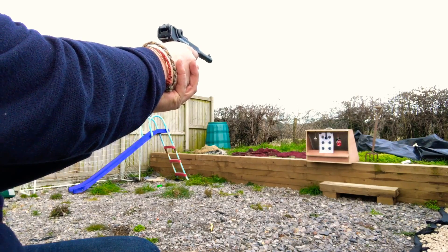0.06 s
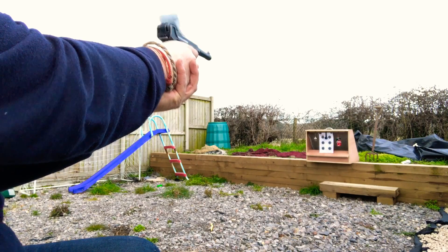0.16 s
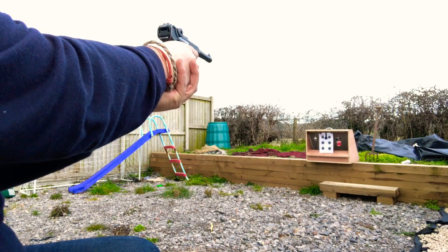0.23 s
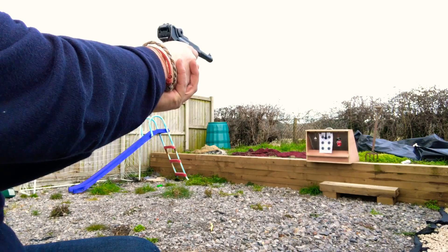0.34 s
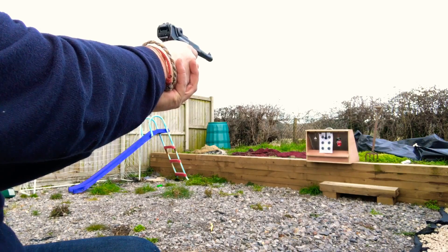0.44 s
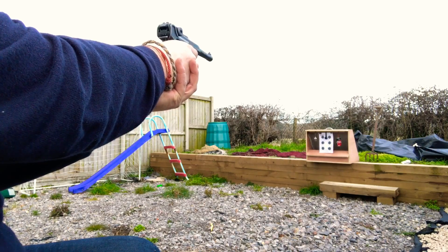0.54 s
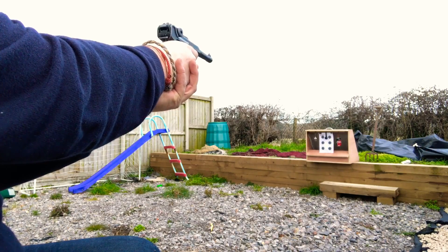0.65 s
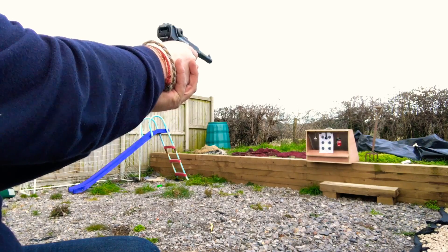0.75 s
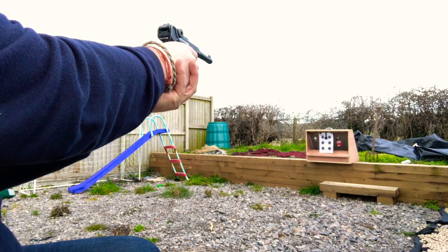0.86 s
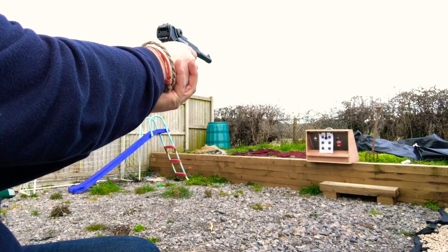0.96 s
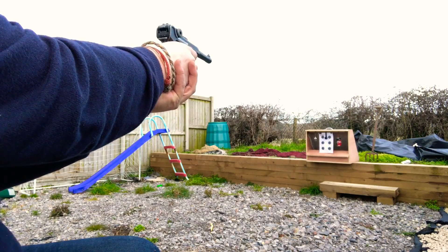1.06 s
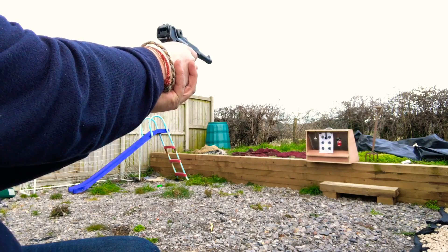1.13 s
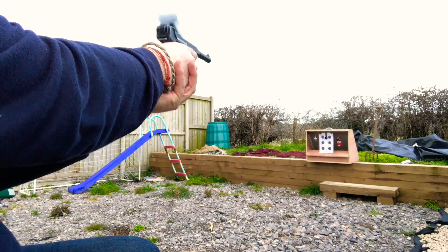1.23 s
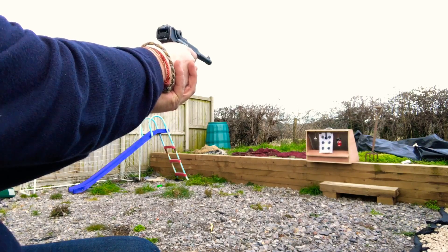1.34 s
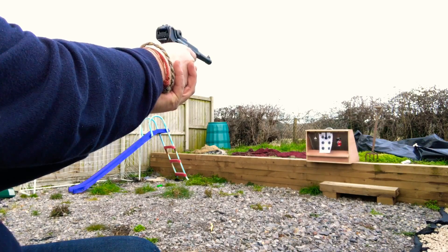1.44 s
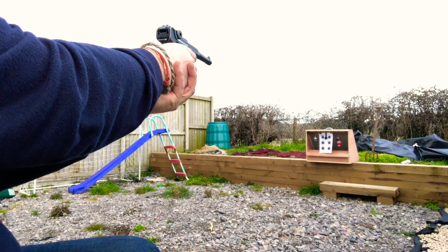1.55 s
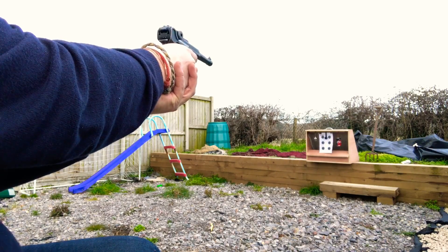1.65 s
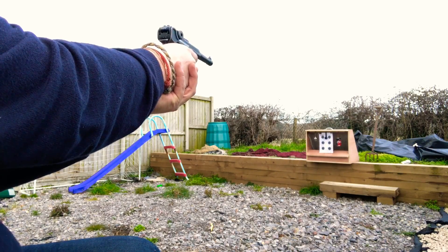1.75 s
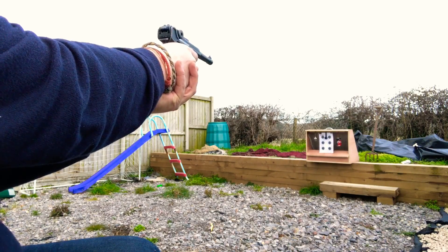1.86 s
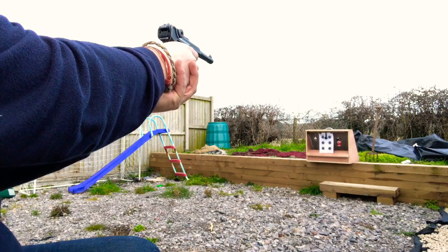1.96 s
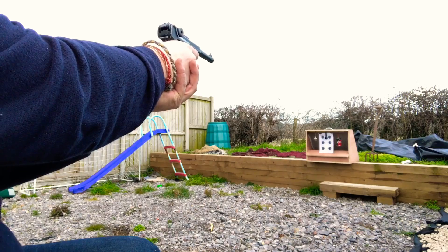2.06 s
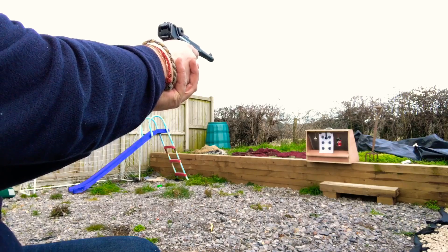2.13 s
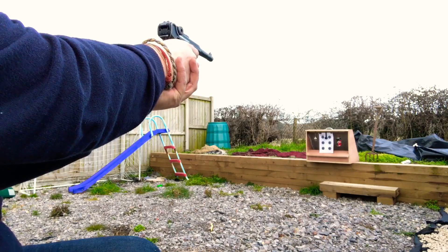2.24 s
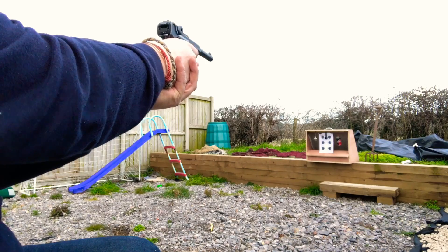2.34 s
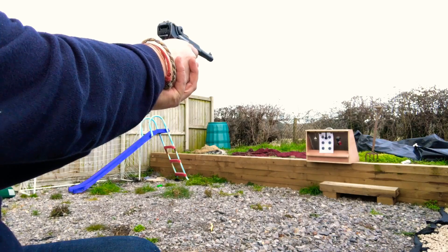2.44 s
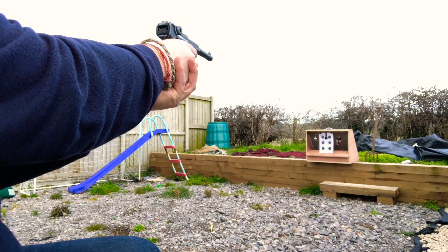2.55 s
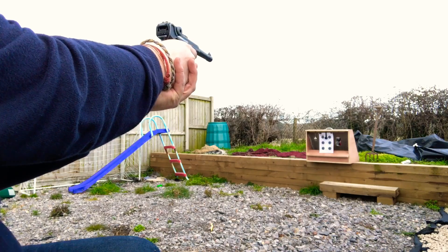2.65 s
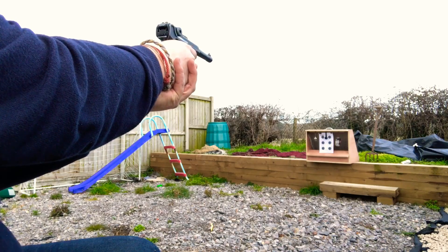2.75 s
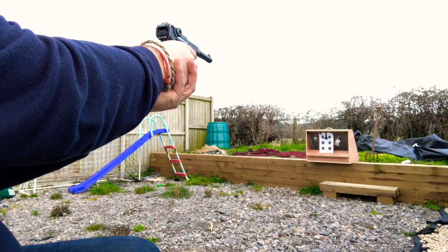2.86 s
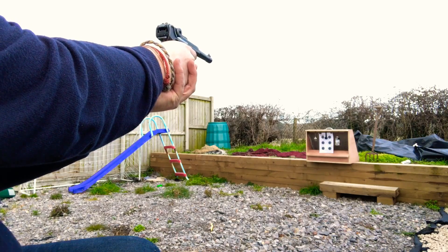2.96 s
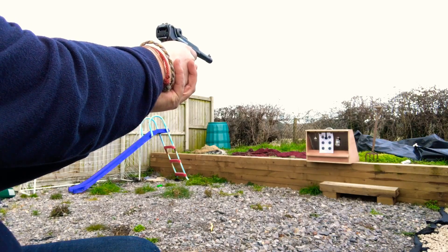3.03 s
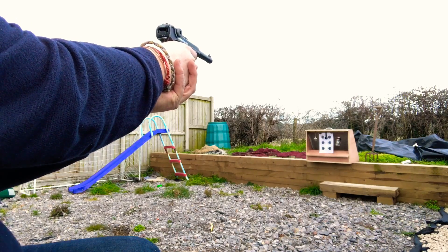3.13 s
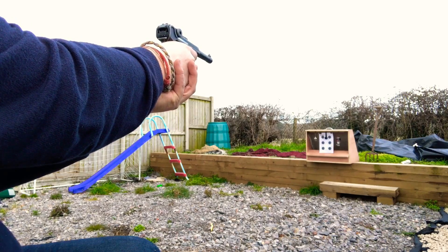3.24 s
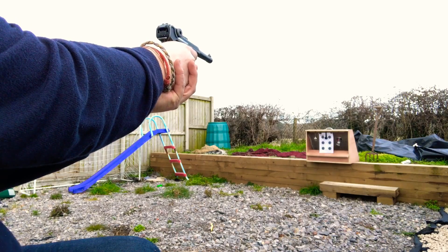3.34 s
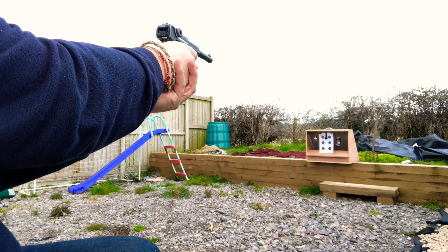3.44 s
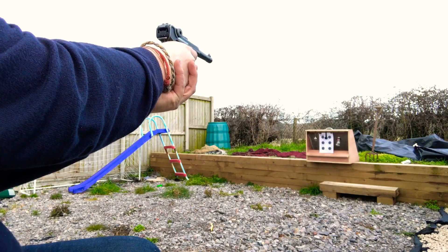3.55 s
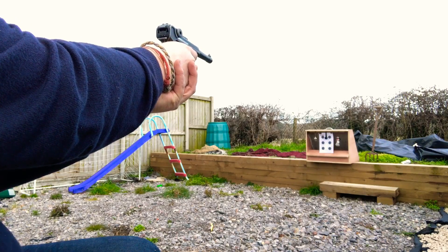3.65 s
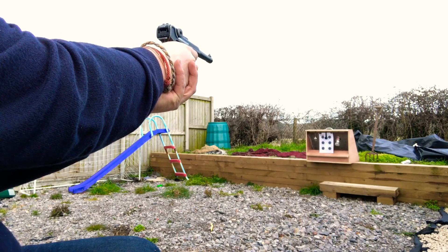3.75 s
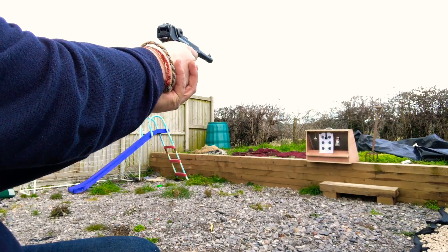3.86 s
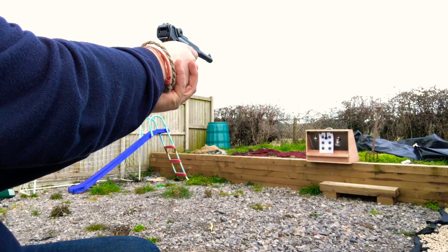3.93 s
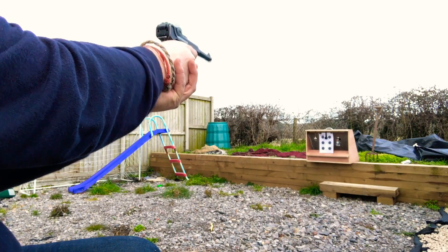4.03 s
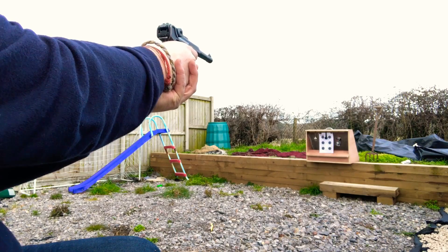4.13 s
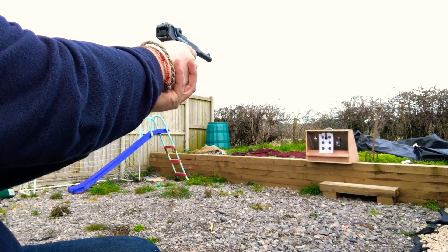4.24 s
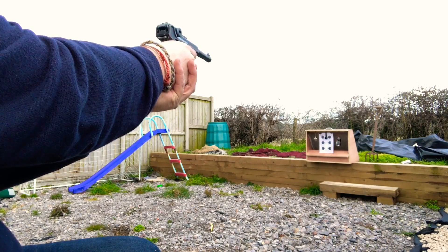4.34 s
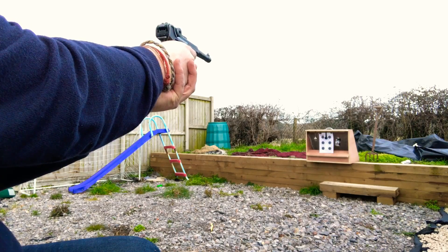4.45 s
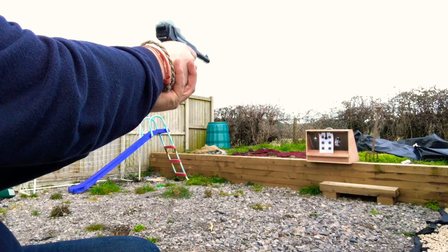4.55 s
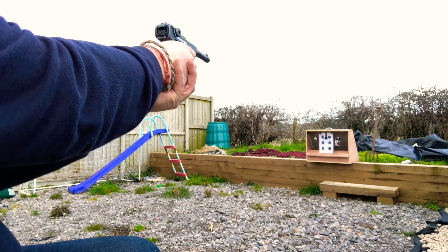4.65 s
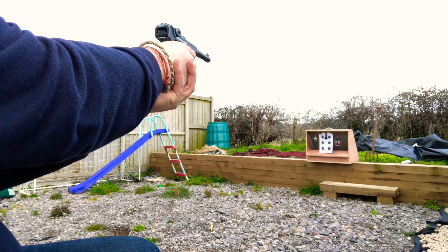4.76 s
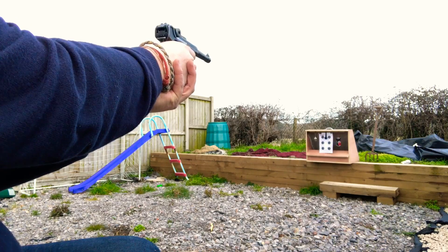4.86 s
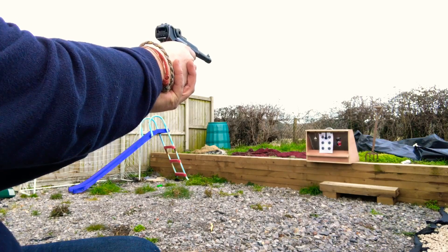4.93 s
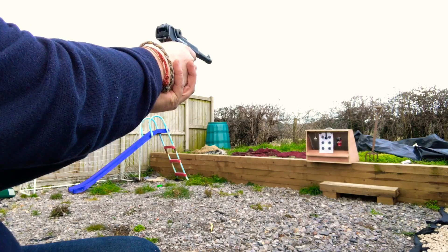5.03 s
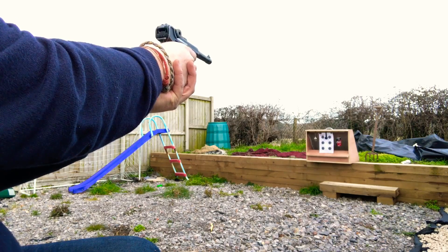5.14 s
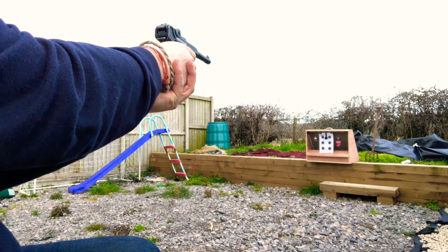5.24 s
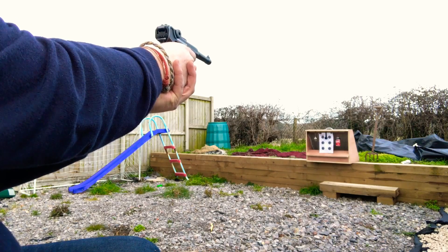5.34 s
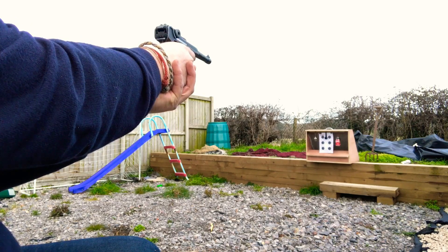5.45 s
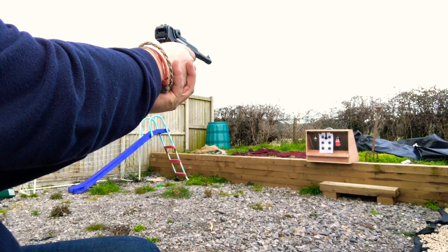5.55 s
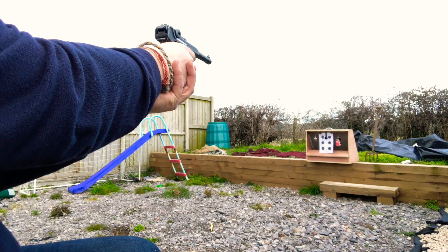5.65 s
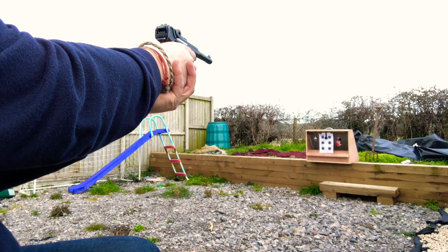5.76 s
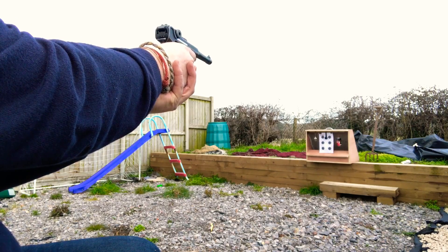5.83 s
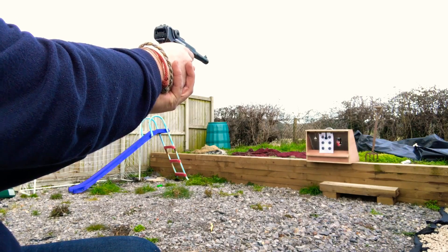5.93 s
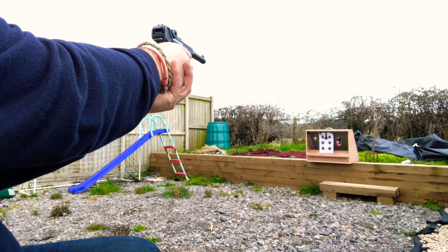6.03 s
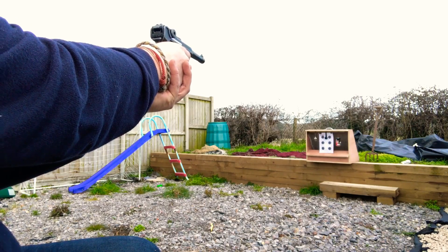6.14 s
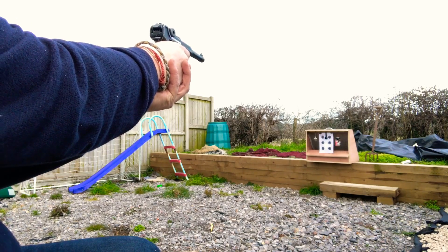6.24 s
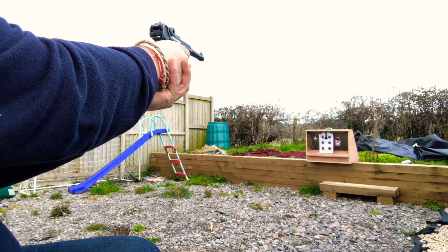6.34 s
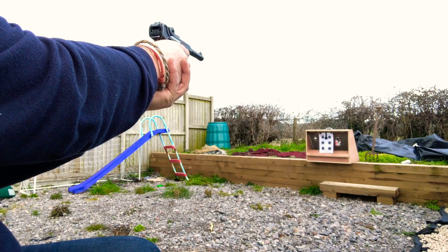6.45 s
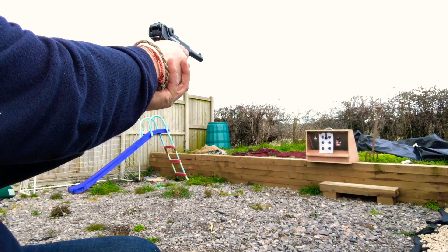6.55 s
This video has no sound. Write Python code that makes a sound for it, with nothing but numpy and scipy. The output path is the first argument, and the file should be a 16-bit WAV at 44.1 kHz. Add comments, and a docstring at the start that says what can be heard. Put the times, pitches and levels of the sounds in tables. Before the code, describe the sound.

Outdoors, three pistol shots come about half a second apart, then a fourth after a longer gap, whose ball hits a tin target that clatters and settles. A quiet pause with faint bird chirps follows, then three more shots. Each is a dry, bright mechanical crack with a puffing thump, closely followed, except the fifth, by a knock on a hollow wooden box. Echoes scatter off fences; a far road hushes beneath; the pistol is close and slightly saturated.

```python
"""Distant traffic washes steadily as filtered noise. Over it a blowback gas pistol fires seven shots in a gravel
garden: noise bursts clack, a pressure pulse thumps from the muzzle and the toggle snaps shut, a little later each shot.
Steel balls crack against a box and excite its panel modes; the hits return from the far end, and spent balls click.
Faint birds whistle as wavering sines, and one ball knocks down a tin target, a bank of decaying modes.
Echoes and a scattered tail follow all but the traffic."""
import sys
import numpy as np
from scipy import signal
from scipy.fft import rfft, irfft
from scipy.io import wavfile
from scipy.ndimage import uniform_filter1d

SR = 44100
rng = np.random.default_rng(int(sys.argv[2]) if len(sys.argv) > 2 else 0)


def persist_wave(psi):
    """Save psi, clipped to +-1, as 16-bit WAV."""
    counts = np.round(np.clip(psi, -1, 1) * 32767).astype(np.int16)
    wavfile.write(sys.argv[1], SR, np.atleast_2d(counts).T)


N = 290619  # samples
AGE = np.arange(SR) / SR  # seconds since a sound began

# Spectrum of the distant road. Each row: frequency in Hz, relative level in dB.
TRAFFIC_SPECTRUM = [(15, -44), (25, -18.5), (59, 2), (114, -3), (285, -5.5), (363, -12.5), (887, -5.5),
                    (1100, -8), (1900, -28), (2600, -31.5), (3820, -31), (16000, -45.5)]
TRAFFIC_DB = -56

# The shots. Each row: hammer fall in seconds, delay of the muzzle gas in seconds, muzzle gas level in dB,
# pitch of its thump in Hz, toggle snap level in dB.
SHOTS = [(.207, .0175, -8, 313, -8.5), (.7739, 0.019, -6.5, 275, -9), (1.2779, .018, -11, 300, -8.5),
         (2.3362, .0197, -7.5, 281, -0.5), (4.055, .019, -9, 283, -8), (4.6213, 0.02, -6.5, 283, -7),
         (5.2474, 0.021, -5, 321.3, -5)]
# Steel contacts in every shot. Each row: delay after the hammer in seconds, level in dB re HAMMER_DB,
# decay in seconds.
ACTION_CONTACTS = [(-.017, -39, 0.0088), (-.0052, -23.5, 0.0048), (0, 2, 0.0025), (.0053, 2, 0.0026),
                   (.0082, -2, .0016), (0.0212, -5, .004), (.030, -7.5, 0.0057)]
HAMMER_DB = -8.5  # the spring strikes equally hard every time
TOGGLE_LAG_S = .0683  # after the hammer, in the first shot
SLOWING_PER_SHOT = .0175  # the gas cools, so the toggle's lag grows by this share of the first
# The trigger ticks under the finger. Each row: start in seconds, level in dB.
TRIGGER_TICKS = [(2.2493, -46), (3.265, -58), (3.43, -59), (4.5758, -54), (5.089, -53.5)]
# Resonances of the pistol frame. Each row: frequency in Hz, width in Hz, relative level in dB.
FRAME_RESONANCES = [(1310, 180, -4.5), (1690, 180, -5.5), (1980, 240, -5), (3400, 220, -9.5),
                    (4400, 180, -11), (5150, 380, 0.5), (6680, 540, -2), (7500, 310, -9.5),
                    (11550, 290, -1.5), (13400, 370, -2), (15500, 490, -6.5)]
# Spectra of steel contacts, muzzle gas and gas from the open breech.
# Each row: frequency in Hz, relative level in dB.
STEEL_SPECTRUM = [(300, -21), (850, -4.5), (1400, 2.5), (3000, 0.5), (5000, 2.5), (7700, 4.5), (9700, -4),
                  (12500, 0.5), (16000, -6.5)]
MUZZLE_SPECTRUM = [(80, -17), (400, 8), (750, 2), (1300, -1), (2300, -6.5), (6000, -9), (16000, -21.5)]
BREECH_SPECTRUM = [(80, -14), (260, 2.5), (600, -2), (2300, -5.5), (6000, -3.5), (9500, -8.5), (16000, -10)]

# Echoes off ground, house and fences. Each row: delay in seconds, level in dB.
ECHOES = [(.0205, -14), (.0315, -18.5), (.046, -19)]
# The garden's tail. Each row: band centre in Hz, relative level in dB, time to fall 60 dB in seconds.
GARDEN_BANDS = [(60, -2, 0.33), (130, 0, 0.87), (252, 0, 0.47), (595, -7, 0.55), (1330, -1, 0.67),
                (2850, -3.5, 0.57), (5480, -7, 0.46), (9000, 0, 0.27), (15000, -6.5, 0.32)]
PATCH_DB, PATCHES_PER_S = 3.3, 240  # scattered sound returns in uneven patches

# Ball strikes on the box. Each row: start in seconds, level in dB, then panel boom in dB re that level,
# panel pitch favoured by the spot in Hz, and hard edge, rebound and returning ping in dB re that level.
HITS = [(.292, -8, 1, 205, -14.5, -11.5, -29.5), (0.8565, -8.5, -2.5, 119.5, -18, -32.5, -33.5),
        (1.3653, -7.5, -1.5, 205, -12, -14, -36), (2.4221, -10, 1.5, 1154, -13, -33.5, -29),
        (4.71, -8, -4, 199, -12, -13, -34.5), (5.338, -12.5, 0.5, 423.5, 2.5, -44, -40)]
# Resonances of the box. Each row: frequency in Hz, width in Hz, relative level in dB.
BOX_RESONANCES = [(1577, 450, -11), (2950, 100, -1.5), (3440, 170, 5), (4250, 270, -3.5), (5400, 500, -15),
                  (7680, 590, -6.5)]
# Modes of the box panels. Each row: frequency in Hz, relative level in dB, time to fall 60 dB in seconds.
PANEL_MODES = [(118, -18, 0.28), (211.6, -23, 0.53), (349, -26.5, 0.5), (402, -19, 0.29),
               (690, -14.5, 0.12), (1011, -11.5, 0.092), (1144, -12.5, 0.17), (1383, -17, 0.12)]
# Spectrum of struck wood. Each row: frequency in Hz, relative level in dB.
WOOD_SPECTRUM = [(80, -18.5), (270, 3.5), (700, -6.5), (2400, -2.5), (3400, -1), (7500, -3), (9800, -17),
                 (16000, -24)]
# the ball rebounds inside the box and strikes a second wall
REBOUND_S, REBOUND_BOOM_DB, REBOUND_HZ, REBOUND_EDGE_DB = .041, -7.5, 1200, -2
SLAP_S, SLAP_DB = 0.011, -8.5  # the fence throws each crack back; dB re the crack

# Blurred tones of the returning ping. Each row: frequency in Hz, width in Hz, relative level in dB.
PING_TONES = [(2420, 240, -2), (2930, 200, -.5), (3480, 300, -3), (5620, 260, 0)]
RETURN_S, RETURN_DB, PING_DECAY_S = .1245, -28, .04  # dB re the hit

# Spent balls drop on wood, graze the box and hop. Each row: start in seconds, level in dB, spot pitch in Hz.
LANDINGS = [(.437, -38.5, 3360), (0.573, -38, 3416), (.608, -46, 1865), (.684, -53.5, 3510),
            (0.989, -37.5, 7570), (1.653, -38, 3400), (1.697, -50.5, 1850), (1.762, -40.5, 3440),
            (1.901, -38.5, 3400), (4.811, -43, 7350), (4.93, -39.5, 3406), (5.041, -48, 3430)]
LANDING_EDGE_DB = -20  # re the click

# Far birds. Each row: start in seconds, length in seconds, first pitch in Hz, last pitch in Hz.
BIRD_NOTES = [(2.112, 0.14, 2660, 2570), (3.678, .1, 2594, 2600), (3.817, .07, 2575, 2550),
              (5.657, .3, 1984, 2134), (6.012, 0.29, 2950, 3280), (6.144, 0.05, 3550, 3630),
              (6.33, 0.13, 6300, 5590), (6.39, .035, 4050, 3950)]
BIRD_DB, BIRD_DB_PER_OCTAVE = -70.5, -4  # level at 2 kHz; the air dulls higher notes
BIRD_FLUTTER_DB, BIRD_WAVER = 3, .018  # waver as a share of the pitch

# The tin is struck, then tumbles from edge to edge. Each row: start in seconds, level in dB,
# pitch favoured by the spot in Hz.
TUMBLE = [(2.4256, -17, 4450), (2.528, -41.5, 8800), (2.548, -37.5, 3800), (2.574, -41, 6000),
          (2.6068, -34, 8100), (2.619, -33.5, 7800), (2.657, -34.5, 1620), (2.6647, -28, 3900),
          (2.7295, -39.5, 4460), (2.742, -35.5, 6400), (2.7525, -32.5, 7300), (2.791, -46.5, 7850),
          (2.8152, -46, 4970), (2.8455, -45, 4840), (2.8723, -42, 1730), (2.902, -42, 7620),
          (2.926, -46, 7740)]
# Low modes of the tin. Each row: frequency in Hz, relative level in dB, time to fall 60 dB in seconds.
TIN_LOW_MODES = [(702.6, -9, 0.25), (872, -12, .35), (1001, -5.5, 0.4), (1230, -5.5, .25),
                 (1378, -10.5, .2), (1770, -5.5, 0.12), (2570, -8.5, 0.24), (3210, -5, .11)]
# Clusters of the tin's crowded upper modes. Each row: frequency in Hz, relative level in dB.
TIN_CLUSTERS = [(1500, -10), (2300, -13), (3300, -1), (4700, 0), (6500, -5), (7700, 1), (9000, -9),
                (10100, -5), (11500, -13), (12800, -1), (14200, -11), (15800, -12)]
TIN_TOP_T60, TIN_REST_S = .1, 2.97  # seconds to fall 60 dB; time at which the tin lies flat

TOP_HZ = 16000  # upper limit of the microphone's band


def amp(db):
    """Decibels to linear gain: twenty to each factor of ten."""
    return 10 ** (np.asarray(db) / 20)


def add(track, s, sound):
    """Superposition: mix a sound into a track from a time in seconds."""
    start = int(s * SR)
    track[start:start + len(sound)] += sound[:N - start]


def unit(response):
    """Energy normalisation: scale a response to unit energy."""
    return response / np.sqrt(np.sum(response ** 2))


def through(x, response):
    """Convolution: pass a sound through an impulse response."""
    return signal.fftconvolve(x, response)[:len(x)]


def thin(x, hz):
    """High-pass filtering: take away the lows below a corner."""
    return signal.sosfilt(signal.butter(2, hz, "high", fs=SR, output="sos"), x)


def colour(points, size=4096):
    """Minimum phase: fold the cepstrum of a (Hz, dB) spectrum into a causal impulse response."""
    hz, db = np.transpose(points)
    log_hz = np.log(np.fft.rfftfreq(size, 1 / SR) + 1)
    log_gain = np.log(amp(np.interp(log_hz, np.log(hz), db)))
    cepstrum = irfft(log_gain)
    cepstrum[1:size // 2] *= 2
    cepstrum[size // 2 + 1:] = 0
    return irfft(np.exp(rfft(cepstrum)), size)


def resonances(rows, size=4096):
    """Damped resonance: a wider (Hz, width, dB) peak decays faster; returns their impulse response."""
    t = AGE[:size]
    response = 0
    for hz, width, db in rows:
        decay = np.exp(-np.pi * width * t)
        response = response + amp(db) * 2 * np.pi * width / SR * decay * np.cos(2 * np.pi * hz * t)
    return response


def burst(rise, decay, size=4096):
    """Transient noise: contact chatter or a puff of gas swells linearly and dies exponentially."""
    t = AGE[:size]
    shape = np.minimum(t / rise, 1) * np.exp(-np.maximum(t - rise, 0) / decay)
    return shape * rng.standard_normal(size)


def walk(rate):
    """Smoothed random steps: slow chance with a spread near 1."""
    k = int(SR / rate)
    held = np.repeat(rng.standard_normal(N // k + 1), k)
    return uniform_filter1d(held, k)[:N] * np.sqrt(3 / 2)


def thump(hz, width, size=2048):
    """Pressure pulse with a dip either side; returns it and the seconds before its centre."""
    t = (np.arange(size) - size // 2) / SR
    return np.exp(-np.abs(t / width) ** 1.6) * np.cos(2 * np.pi * hz * t), size / 2 / SR


def ringing(hz, t60):
    """Modal decay: one exponentially decaying complex oscillation a row, half a second long."""
    return np.exp(np.outer(2j * np.pi * hz - np.log(1000) / t60, AGE[:SR // 2]))


def favour(hz, spot_hz, width):
    """Selective excitation: weight 0-1 of each mode by nearness to the pitch a struck spot prefers."""
    return np.exp(-(np.log(hz / spot_hz) / width) ** 2)


def traffic():
    """Broadband noise: a far road is a steady wash that swells a little."""
    wash = through(rng.standard_normal(N), unit(colour(TRAFFIC_SPECTRUM)))
    return wash * amp(TRAFFIC_DB + 0.34 * walk(1.1) + 0.44 * walk(12))


def pistol():
    """Impact and gas expansion: contacts ring steel, gas thumps; returns (near sound, sound sent all round)."""
    steel, snap, blast, vent, low = np.zeros((5, N))
    kick, kick_lead = thump(hz=330, width=0.0013)
    for shot, (s, muzzle_lag, muzzle_db, thump_hz, toggle_db) in enumerate(SHOTS):
        muzzle_s = s + muzzle_lag
        toggle_s = s + TOGGLE_LAG_S * (1 + SLOWING_PER_SHOT * shot)
        for delay, db, decay in ACTION_CONTACTS:
            add(steel, s + delay, amp(HAMMER_DB + db) * burst(.0007, decay))
        add(low, s + 0.0053 - kick_lead, amp(HAMMER_DB - 7.5) * kick)
        # gas escapes from the open breech
        add(vent, muzzle_s - .005, amp(HAMMER_DB - 9.5) * burst(0.002, 0.028))
        puff, puff_lead = thump(hz=thump_hz, width=0.0021)
        add(low, muzzle_s - puff_lead, amp(muzzle_db) * puff)
        add(blast, muzzle_s - .004, amp(muzzle_db - 10) * burst(0.0013, 0.01))
        # the toggle scrapes along its rails before it locks
        add(steel, toggle_s - .018, amp(-20.5) * burst(0.011, 0.0086))
        add(snap, toggle_s, amp(toggle_db + 1.5) * burst(.0007, .0016))
    for s, db in TRIGGER_TICKS:
        add(steel, s, amp(db) * burst(0.0003, 0.0027))
    plain, frame = colour(STEEL_SPECTRUM), resonances(FRAME_RESONANCES)
    clack = through(steel, unit(amp(-2.0) * plain + frame))
    # the toggle's harder contact rings the frame most
    lock = through(snap, unit(thin(amp(-13.5) * plain + frame, hz=1100)))
    muzzle_gas = through(blast, unit(colour(MUZZLE_SPECTRUM)))
    breech_gas = through(vent, unit(colour(BREECH_SPECTRUM)))
    gas = muzzle_gas + breech_gas + low
    # each resonance beams its own way, so all round they even out
    return np.array([clack + lock + gas, through(steel + snap, unit(plain)) + gas])


def garden(dry):
    """Reflection and scattering: distinct echoes, then a tail off gravel, fences and hedge; its top dies first."""
    hz, db, t60 = np.transpose(GARDEN_BANDS)
    log_hz = np.log(np.fft.rfftfreq(SR, 1 / SR) + 1)
    noise = rfft(rng.standard_normal(SR) * amp(-4.5))
    tail = 0
    for band, band_db, band_t60 in zip(np.eye(len(hz)), db, t60):
        band_noise = irfft(noise * np.interp(log_hz, np.log(hz), band), SR)
        scatter = band_noise * amp(PATCH_DB * walk(PATCHES_PER_S)[:SR])
        near = amp(-45.5) * np.exp(-AGE / 0.027)
        far = amp(-40.5) * np.exp(-np.log(1000) * AGE / band_t60)
        tail = tail + amp(band_db) * scatter * (near + far)
    tail *= np.clip(AGE / 0.045, 0, 1) ** 2  # the scatter builds up gradually
    echoes = np.zeros(SR)
    for delay, echo_db in ECHOES:
        echoes[int(delay * SR)] += amp(echo_db)
    # rough surfaces mirror only the lows
    echoes = signal.sosfilt(signal.butter(1, 2500, fs=SR, output="sos"), echoes)
    return through(dry, tail + echoes)


def target_box():
    """Modal excitation: each impact cracks and booms the panels; returns (near sound, sound sent all round)."""
    crack, slap, edge, boom = np.zeros((4, N))
    hz, mode_db, t60 = np.transpose(PANEL_MODES)
    swing_up = 1 - np.exp(-np.outer(hz, AGE[:SR // 2]) / 3)  # a panel takes a few cycles
    modes = ringing(hz, t60).imag * swing_up
    strikes = []
    for s, db, boom_db, spot_hz, edge_db, rebound_db, _ in HITS:
        strikes.append((s, db, boom_db, spot_hz, edge_db))
        strikes.append((s + REBOUND_S, db + rebound_db, REBOUND_BOOM_DB, REBOUND_HZ, REBOUND_EDGE_DB))
    for s, db, boom_db, spot_hz, edge_db in strikes:
        add(crack, s, amp(db) * burst(0.00015, .0052))
        add(slap, s + SLAP_S, amp(db + SLAP_DB) * burst(0.0026, 0.007))
        add(edge, s, amp(db + edge_db) * burst(.0002, .0024))
        favour_db = 11 * favour(hz, spot_hz, 0.33)
        add(boom, s, amp(db + boom_db - 10.5 + mode_db + favour_db) @ modes)
    wood = colour(WOOD_SPECTRUM)
    # the small front plate sends no bass
    face = unit(thin(amp(-5) * wood, hz=1300) + resonances(BOX_RESONANCES))
    rest = through(slap, unit(wood)) + through(edge, unit(colour(STEEL_SPECTRUM))) + boom
    return np.array([through(crack, face) + rest, amp(-0.5) * through(crack, unit(wood)) + rest])


def far_return():
    """Delayed reflection: every hit comes back from the garden's far end with a faint, blurred ping."""
    slap, ring = np.zeros((2, N))
    ping = unit(through(resonances(PING_TONES), resonances(PING_TONES)))  # twice, for steep sides
    for s, db, *_, ping_db in HITS:
        add(slap, s + RETURN_S, amp(db + RETURN_DB) * burst(.0006, 0.007))
        patches = amp(PATCH_DB * walk(PATCHES_PER_S)[:SR // 2])
        scattered = burst(.002, PING_DECAY_S, size=SR // 2) * patches
        add(ring, s + RETURN_S, amp(db + ping_db) * through(scattered, ping))
    return through(slap, unit(colour(WOOD_SPECTRUM))) + ring


def spent_balls():
    """Light impact: each landing clicks on wood, rings its spot and adds a little steel edge."""
    knock, edge, ring = np.zeros((3, N))
    for s, db, pitch_hz in LANDINGS:
        click = amp(db) * burst(.0003, .0026)
        add(knock, s, amp(1.5) * click)
        add(ring, s, through(click, unit(resonances([(pitch_hz, 450, 0)]))))
        add(edge, s, amp(LANDING_EDGE_DB) * click)
    return through(knock, unit(colour(WOOD_SPECTRUM))) + through(edge, unit(colour(STEEL_SPECTRUM))) + ring


def birds():
    """Frequency and amplitude modulation: thin gliding whistles waver and flutter."""
    out = np.zeros(N)
    for s, length, first_hz, last_hz in BIRD_NOTES:
        count = int(length * SR)
        hz = np.linspace(first_hz, last_hz, count) * (1 + BIRD_WAVER * walk(200)[:count])
        note_db = BIRD_DB + BIRD_DB_PER_OCTAVE * np.log2(first_hz / 2000)
        level = amp(note_db + BIRD_FLUTTER_DB * walk(70)[:count])
        whistle = np.sin(2 * np.pi * np.cumsum(hz) / SR)
        add(out, s, level * np.sqrt(np.hanning(count)) * whistle)
    return out


def tin_target(count=160):
    """Modal superposition: each knock shares itself differently among the modes; the rim chatters after it."""
    clatter, ring = np.zeros((2, N))
    low_hz, low_db, low_t60 = np.transpose(TIN_LOW_MODES)
    cluster_hz, cluster_db = np.transpose(TIN_CLUSTERS)
    # one upper mode at random in each of many equal steps
    top_hz = cluster_hz[0] + (np.arange(count) + rng.random(count)) / count * np.ptp(cluster_hz)
    top_db = np.interp(top_hz, cluster_hz, cluster_db) - 8
    hz, mode_db = np.r_[low_hz, top_hz], np.r_[low_db, top_db]
    modes = ringing(hz, np.r_[low_t60, np.full(count, TIN_TOP_T60)])
    for s, db, spot_hz in TUMBLE:
        share = amp(mode_db + 8 * favour(hz, spot_hz, .4) + 2 * rng.standard_normal(len(hz)))
        phase = np.exp(2j * np.pi * rng.random(len(hz)))
        add(ring, s, amp(db - 9.5) * ((share * phase) @ modes).imag)
        contact_db = cluster_db + 15 * favour(cluster_hz, spot_hz, 0.6)
        contact = unit(colour([(200, -30), *zip(cluster_hz, contact_db)]))
        add(clatter, s, amp(db - 0.5) * through(burst(0.00092, 0.0053), contact))
        for lag in np.cumsum(rng.uniform(.005, .018, size=7)):
            chatter = through(burst(.0002, .0015), contact)
            add(clatter, s + lag, amp(db - 6) * np.exp(-lag / .045) * chatter)
    # lying flat, it stops ringing
    ring *= np.exp(-np.maximum(np.arange(N) / SR - TIN_REST_S, 0) / 0.022)
    return ring + clatter


def scene():
    """Superposition: direct sounds, the garden's response to what is sent all round, and the road."""
    near, all_round = pistol() + target_box() + far_return() + spent_balls() + birds() + tin_target()
    return (near + garden(all_round) + traffic())[None]


def record(dry):
    """Band limiting and saturation: the microphone thins deep bass and rounds loud peaks; the top is cut."""
    lean = signal.sosfilt(signal.butter(1, 45, "high", fs=SR, output="sos"), dry)
    rounded = np.tanh(1.05 * lean) / 1.05
    return signal.sosfilt(signal.ellip(8, .2, 70, TOP_HZ, fs=SR, output="sos"), rounded)


dry = scene()
out = record(dry)
persist_wave(out)
```